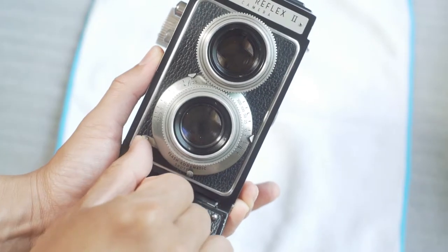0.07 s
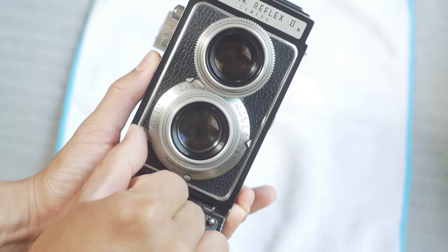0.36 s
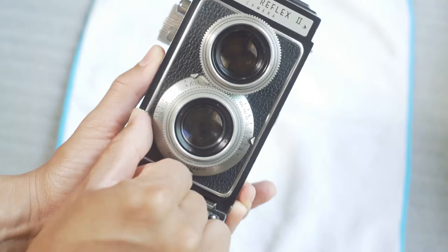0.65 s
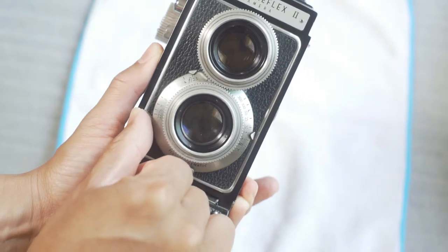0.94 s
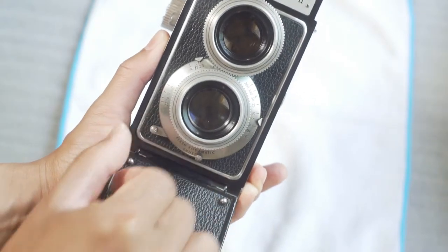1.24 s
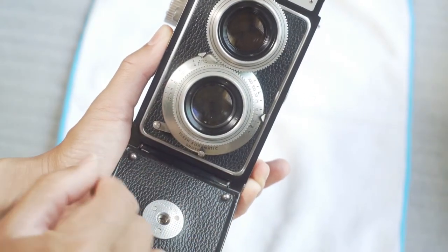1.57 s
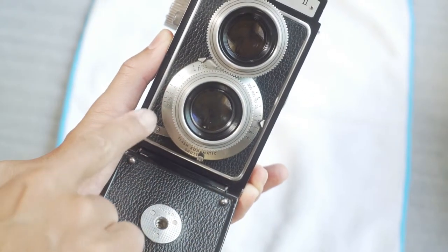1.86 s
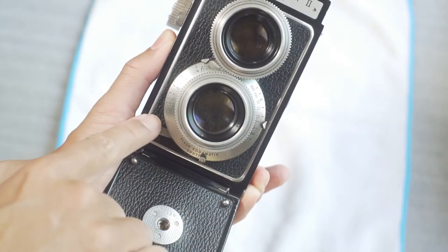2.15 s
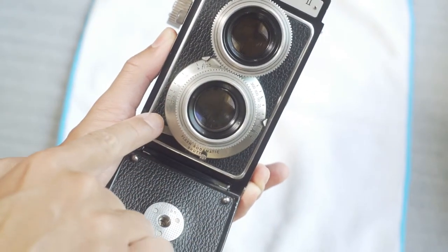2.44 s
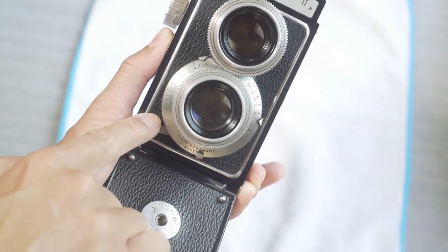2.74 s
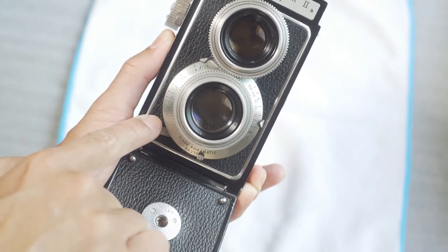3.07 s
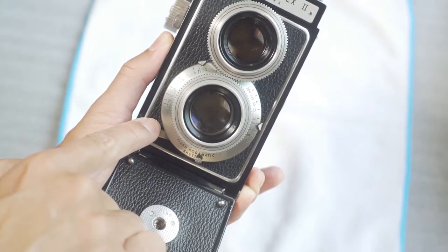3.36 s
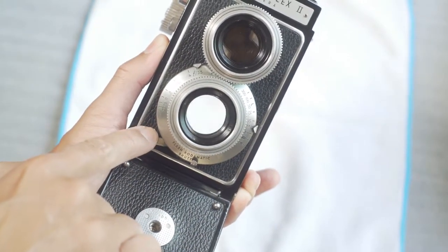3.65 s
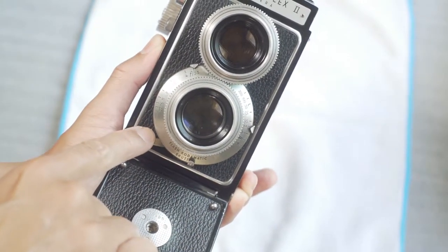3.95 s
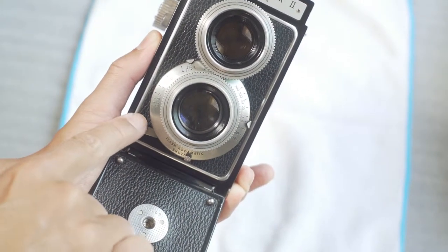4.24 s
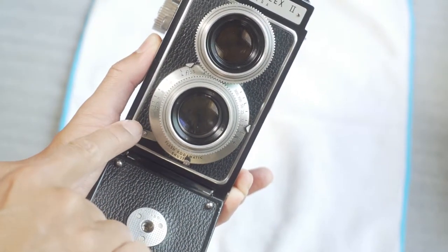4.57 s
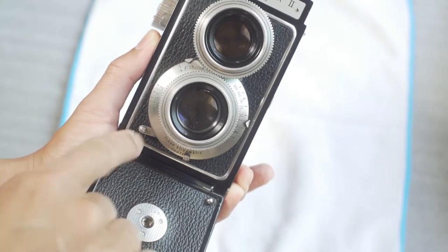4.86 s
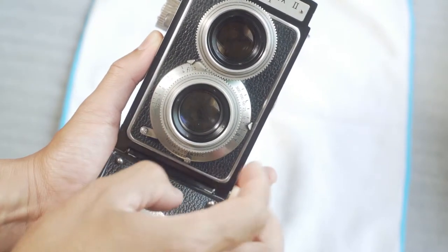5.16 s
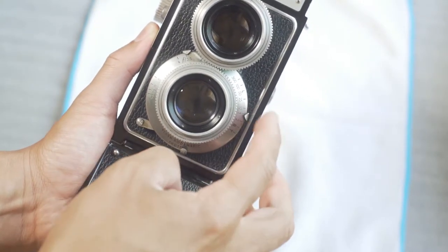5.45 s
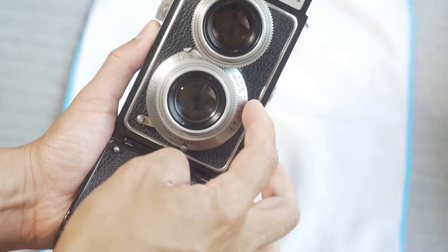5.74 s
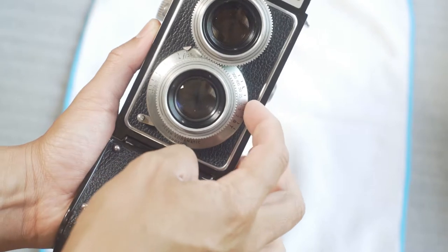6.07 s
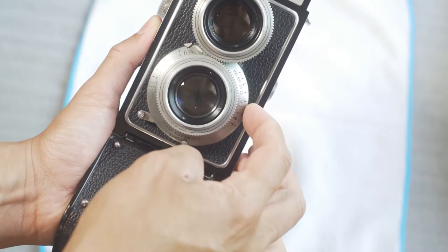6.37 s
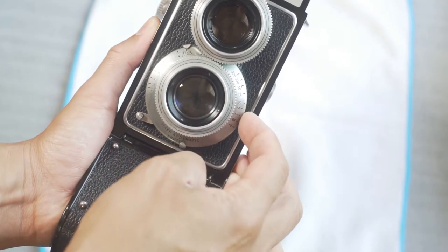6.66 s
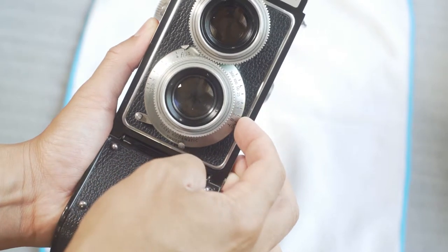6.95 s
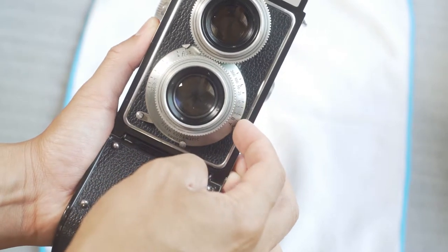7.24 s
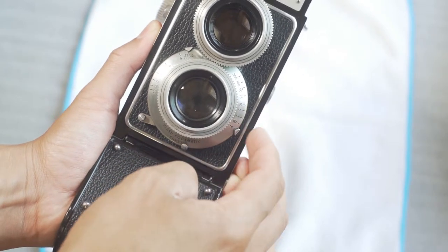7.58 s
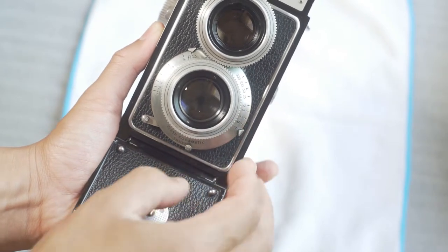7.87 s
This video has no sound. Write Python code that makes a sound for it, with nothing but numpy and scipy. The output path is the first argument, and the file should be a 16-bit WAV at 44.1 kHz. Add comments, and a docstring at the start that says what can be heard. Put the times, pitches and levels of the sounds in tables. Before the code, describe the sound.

An old mechanical camera is cocked and fired close up, with a brief gear whir, sharp metal clicks and a short buzz.

```python
"""A whir, sharp metal snaps and a short buzz, close up over a soft fan hum in a small room: the leaf
shutter of an old twin-lens camera, worked by hand. The cocking lever winds its gears against a spring,
latches and snaps back; on release the blades open, a slow-speed escapement buzzes and the blades shut.
Then a setting lever scrapes round the lens and drops into its stops. Each click is a burst of tiny
rebounds ringing a metal part; a rustle of leather, a faint squeak and a thin whine lie underneath."""
import sys
import numpy as np
from scipy import signal
from scipy.fft import rfft, irfft, next_fast_len
from scipy.io import wavfile
from scipy.ndimage import uniform_filter1d

SR = 44100
rng = np.random.default_rng(int(sys.argv[2]) if len(sys.argv) > 2 else 0)


def log_audio(samples):
    """Write samples as a 16-bit WAV file to the path given in sys.argv[1]."""
    # one column per channel
    frames = np.atleast_2d(samples).T
    # limit to full scale, then quantise
    limited = np.clip(frames, -1, 1)
    pcm = np.round(limited * 32767).astype(np.int16)
    wavfile.write(sys.argv[1], SR, pcm)


N = 353241
TIME = np.arange(N) / SR
SIZE = 4096   # samples in one contact sound
BINS = np.maximum(np.fft.rfftfreq(SIZE, 1 / SR), 1)   # its frequencies, Hz

# rings of the struck parts: (frequency [Hz], width [Hz], height above the broadband crack [dB])
LATCH_MODES = [(1146, 87, 14), (1487, 140, 16.5), (2015, 96, 15.6), (3000, 150, 3.5), (3200, 190, 8.6),
               (4250, 560, 4.9), (6620, 220, 7.6), (8700, 480, 1)]
RETURN_MODES = [(1160, 130, 7.8), (1850, 150, 9.5), (2250, 260, 5.7), (3170, 300, 11.8), (3900, 180, 12.8),
                (5940, 320, 1.1), (7960, 240, 4.1), (13300, 2400, 8.5)]
BLADE_MODES = [(1320, 64, 1), (2215, 210, 11.8), (3220, 230, 10.5), (4200, 280, 2.7), (4970, 400, 10),
               (8740, 260, 4.9), (10150, 370, 2.3), (13250, 200, 1.9)]
DETENT_MODES = [(2100, 540, 12), (2460, 300, 8.3), (3080, 200, 14.6), (3960, 210, 11), (8700, 1400, 6.4),
                (11700, 380, 11), (13600, 600, 3)]
STOP_MODES = [(2050, 510, 5.5), (3090, 140, 23), (3210, 170, 24.6), (4570, 500, 8), (5800, 220, 8.8),
              (8460, 1100, 7.4)]


def from_db(db):
    """Decibels to gain."""
    return 10 ** (np.asarray(db) / 20)


def at_hz(points, hz):
    """Read a curve on a log-frequency axis."""
    f, value = np.transpose(points)
    return np.interp(np.log(np.maximum(hz, 1)), np.log(f), value)


def envelope(rows, attack_s, release_s, sag_db_per_s=0):
    """Gain for rows of (start [s], end [s], level [dB]): straight rise, hold that may sag, dying tail."""
    out = np.zeros(N)
    for start, end, db in rows:
        age = np.maximum(TIME - start, 0)
        tail = np.exp(-np.maximum(TIME - end, 0) / release_s)
        out += from_db(db - sag_db_per_s * age) * np.minimum(age / attack_s, 1) * tail
    return out


def rms_one(x):
    """Scale to unit power."""
    return x / np.sqrt(np.mean(x ** 2) + 1e-20)


def drift(per_s):
    """Smooth random wander of unit power."""
    knots = rng.standard_normal(int(per_s * N / SR) + 2)
    return rms_one(np.interp(TIME * per_s, np.arange(len(knots)), knots))


def convolve(x, response):
    """Pass a sound through an impulse response."""
    return signal.fftconvolve(np.atleast_2d(x), response, axes=-1)[:, :N]


def add(out, s, sound):
    """Mix a short sound in at s seconds."""
    start = int(s * SR)
    out[:, start:start + sound.shape[1]] += sound[:, :N - start]


def tone(hz, waver_hz, per_s):
    """A sine of unit power whose pitch wavers at random."""
    return np.sqrt(2) * np.sin(2 * np.pi * np.cumsum(hz + waver_hz * drift(per_s)) / SR)


def noise(spectrum):
    """Coloured stereo noise, centred in the bass and wide in the treble."""
    # how alike the two sides are: (frequency [Hz], correlation [ratio])
    likeness = [(60, 1), (150, 0.94), (380, 0.92), (950, 0.43), (2380, 0.18), (5980, -0.16), (15000, -0.39)]
    size = next_fast_len(N)
    hz = np.fft.rfftfreq(size, 1 / SR)
    alike = np.clip(at_hz(likeness, hz), 0, 1)
    mid, side = rfft(rng.standard_normal((2, size)))
    pair = np.sqrt(1 + alike) * mid + np.sqrt(1 - alike) * side * [[1], [-1]]
    pair[1] *= np.exp(-2j * np.pi * hz * .00012)   # reaches the right side slightly later
    return rms_one(irfft(pair * from_db(at_hz(spectrum, hz)), size)[:, :N])


def fan():
    """A fan lays down a soft, steady rush of air and a few wavering hum lines."""
    # colour of the rush: (frequency [Hz], spectral level [dB])
    air = [(25, -17.5), (60, -3), (100, -7.5), (135, -2.5), (185, -8), (270, -1.5), (350, -2), (480, -6),
           (620, -5.5), (1000, -11.5), (2500, -18), (3000, -20.5), (6000, -22.5), (16000, -28)]
    # hum lines: (frequency [Hz], level [dB])
    hum_lines = [(77, -74), (239, -71), (280, -68.5), (414.5, -70.5), (603, -72), (839.8, -73), (2546, -80)]
    hum = sum(from_db(db) * tone(hz, waver_hz=3.424, per_s=25) for hz, db in hum_lines)
    return from_db(-55.5) * noise(air) + hum


def metal(modes, tilt_db, lowest_hz, leak_db=-17):
    """Ring of a small part: modes stand on a broadband crack, and little radiates below lowest_hz."""
    # the crack of any contact in the shutter: (frequency [Hz], spectral level [dB])
    crack = [(100, -20), (400, 5.5), (800, -5), (1200, 0.5), (2000, 2), (3000, 1), (5000, 0.5), (7000, 1.5),
             (10000, 0), (14000, 0), (15500, -5), (16000, -11)]
    peaks = sum(from_db(db) ** 2 / (1 + (2 * (BINS - hz) / width) ** 2) for hz, width, db in modes)
    bass_db = 10 * np.log10(from_db(leak_db) ** 2 + 1 / (1 + (lowest_hz / BINS) ** 10))
    brightness_db = tilt_db * np.log2(np.maximum(BINS, 800) / 5000)
    spectrum_db = at_hz(crack, BINS) + 10 * np.log10(1 + peaks) + bass_db + brightness_db
    # minimum phase: the attack comes first, the ring after
    cepstrum = irfft(np.log(from_db(spectrum_db)))
    cepstrum[1:SIZE // 2] *= 2
    cepstrum[SIZE // 2 + 1:] = 0
    return irfft(np.exp(rfft(cepstrum)))


def chatter(length_s, linger=.24, passes=4):
    """A swell of tiny rebounds and a weaker trail, with an even spectrum and unit energy."""
    age = TIME[:SIZE] / length_s
    shape = np.minimum(8 * age, 1) * (np.exp(-age ** 2) + linger * np.exp(-age / 2))
    burst = rng.standard_normal(SIZE) * shape
    for _ in range(passes):   # flatten the spectrum, then restore the swell
        burst = irfft(np.exp(1j * np.angle(rfft(burst))))
        burst *= shape / np.sqrt(np.abs(uniform_filter1d(burst ** 2, size=48)) + 1e-12)
    return burst / np.linalg.norm(burst)


def contact(length_s, modes, tilt_db, lowest_hz, spread=0.52, spread_hz=3000):
    """One click: rebounds ring a metal part, whose treble reaches each side differently."""
    highpass = signal.butter(1, spread_hz, "high", fs=SR, output="sos")
    side = signal.sosfilt(highpass, chatter(length_s))
    burst = chatter(length_s) + spread * side * np.array([[1], [-1]])
    return convolve(burst, metal(modes, tilt_db, lowest_hz)[None])[:, :SIZE]


def clicks(hits, lowest_hz):
    """A run of metal contacts, each with its own level, brightness, clatter and ring."""
    out = np.zeros((2, N))
    for s, db, tilt_db, length_s, modes in hits:
        add(out, s, from_db(db) * contact(length_s, modes, tilt_db, lowest_hz))
    return out


def touches():
    """A finger takes up or eases off a lever; each light tick rings the same linkage."""
    # ring of the linkage: (frequency [Hz], width [Hz], height [dB])
    linkage_modes = [(1090, 180, 10.5), (2260, 150, 9), (3000, 230, 12), (4000, 170, 11), (4970, 320, 7)]
    # finger contacts: (time [s], level [dB], brightness [dB/octave], clatter [s])
    ticks = [ (0.103, -22, 0, .0036), (.212, -29, 0.5, 0.0093), (.3, -21, 2.5, 0.008),
             (.549, -32, -4, 0.0075), (1.042, -36, -5.5, .0055), (1.0575, -30.5, 0, .0039),
             (1.086, -32.5, -2, .008), (1.136, -29.5, -4.5, 0.031), (1.238, -27, -5.5, .011),
             (4.092, -37, -4, 0.0074), ]
    return clicks([(*tick, linkage_modes) for tick in ticks], lowest_hz=900)


def gear_train(teeth_per_s, modes, tilt_db, jitter, uneven_db, slide):
    """Each tooth catches, then slides with fading friction until the next."""
    teeth = np.cumsum(teeth_per_s * np.abs(1 + jitter * drift(150))) / SR
    force = from_db(uneven_db * rng.standard_normal(N))[teeth.astype(int)]
    friction = force * np.exp(-(teeth % 1) / slide) * rng.standard_normal(N)
    return rms_one(convolve(friction, contact(0.00075, modes, tilt_db, lowest_hz=950)))


def winding():
    """The cocking gears whir, fading as the spring resists."""
    # ring of the gears: (frequency [Hz], width [Hz], height [dB])
    modes = [(1100, 100, 10.5), (4000, 330, -5), (6500, 570, 5), (12300, 2000, -2)]
    # the lever takes up its slack, then winds the spring: (start [s], end [s], level [dB])
    strokes = [(.24, .3, -60), (.303, .46, -50)]
    whir = gear_train(teeth_per_s=179.6, modes=modes, tilt_db=.2, jitter=.043, uneven_db=1.5, slide=.81)
    return envelope(strokes, attack_s=0.0055, release_s=0.15, sag_db_per_s=9) * whir


def shutter_snaps():
    """Sprung parts strike home: the spring latches, the lever flies back, the blades open and shut."""
    # strikes: (time [s], level [dB], brightness [dB/octave], clatter [s], modes)
    strikes = [ (.5999, 2.5, 0.1, 0.0041, LATCH_MODES), (1.1662, -1, 0.2, 0.0071, RETURN_MODES),
               (3.6017, -6.5, -2, 0.0059, BLADE_MODES), (3.6077, 4.5, 0, 0.0041, BLADE_MODES),
               (3.777, -14, -2, .0037, BLADE_MODES), (3.7829, -1, 1.5, 0.0032, BLADE_MODES), ]
    return clicks(strikes, lowest_hz=893)


def handling():
    """The hand shifts on the leather case with a dull rustle."""
    # hand movements: (start [s], end [s], level [dB])
    shifts = [(.95, 1.27, -60), (1.52, 2.07, -56.5)]
    # colour of rubbed leather: (frequency [Hz], spectral level [dB])
    leather = [(80, -17), (180, -10), (330, 0), (600, -10.5), (1500, -13.5), (5000, -29)]
    return envelope(shifts, attack_s=0.052, release_s=0.11) * noise(leather)


def squeak(flicker_db=2.5):
    """A faint, thin squeak warbles as its pitch arches up and down."""
    # when it sounds: (start [s], end [s], level [dB])
    span = [(1.51, 2.0, -67)]
    # its partials: (multiple of the pitch [ratio], level [dB])
    partials = [(1, -3.5), (1.345, -8), (2.001, -2)]
    top_hz, top_s, bend_hz_per_s2 = 5190, 1.755, 6600
    warble_per_s, depth_hz, crest_s = 5.7, 231, 1.772
    arch = np.maximum(top_hz - bend_hz_per_s2 * (TIME - top_s) ** 2, 0)
    pitch = arch + depth_hz * np.cos(2 * np.pi * warble_per_s * (TIME - crest_s))
    voice = sum(from_db(db + flicker_db * drift(18)) * tone(multiple * pitch, waver_hz=109, per_s=1400)
                for multiple, db in partials)
    return envelope(span, attack_s=0.06, release_s=.05, sag_db_per_s=5) * voice


def whine():
    """A faint, high whine of nearly steady pitch comes and goes."""
    # when it sounds: (start [s], end [s], level [dB])
    spans = [(2.89, 3.08, -73.5), (3.27, 3.58, -82.5)]
    return envelope(spans, attack_s=0.045, release_s=.05) * tone(hz=5070, waver_hz=35, per_s=520)


def escapement(swell_db=6, swell_s=0.011):
    """The timer's teeth buzz, swelling just before it lets the blades shut."""
    # ring of the escapement: (frequency [Hz], width [Hz], height [dB])
    modes = [(1300, 300, 5), (2130, 330, 11.5), (4950, 270, 10.5), (5700, 330, 3), (7200, 1800, 4.5),
             (11000, 1500, 2)]
    # it runs while the blades are open: (start [s], end [s], level [dB])
    run = [(3.612, 3.782, -38.8)]
    time_left = np.maximum(run[0][1] - TIME, 0)
    swell = from_db(swell_db * np.exp(-time_left / swell_s))
    buzz = gear_train(teeth_per_s=372, modes=modes, tilt_db=0.3, jitter=.28, uneven_db=0, slide=0.6)
    return envelope(run, attack_s=.025, release_s=0.00081) * swell * buzz


def lever_scrape(grains_per_s=200, grain_db=3, tilt_db=-2.5, grain_s=0.0023, jerk_s=0.0038):
    """Dry friction: each push sets off a stream of tiny catches; larger jerks ring the setting lever."""
    # ring of the lever: (frequency [Hz], width [Hz], height [dB])
    modes = [(1150, 500, 7), (3380, 260, 15), (6700, 550, 10), (11800, 900, 11)]
    # pushes along its track: (start [s], end [s], level [dB])
    pushes = [(6.245, 6.32, -59), (6.51, 6.67, -68), (6.675, 6.8, -57.5), (6.97, 7.04, -62)]
    # it sticks and jerks free: (time [s], level [dB])
    jerks = [(6.328, -34), (6.5243, -36.5), (6.6125, -35.5), (6.71, -29), (6.7396, -30.5), (6.786, -33.5),
             (6.8028, -35), (6.9125, -38.5)]
    catches = (rng.random(N) < grains_per_s / SR) * rng.choice([-1, 1], N)
    grains = catches * from_db(grain_db * rng.standard_normal(N))
    scrape = rms_one(convolve(grains, contact(grain_s, modes, tilt_db, lowest_hz=890)))
    out = envelope(pushes, attack_s=0.024, release_s=.02) * scrape
    for s, db in jerks:
        add(out, s, from_db(db) * contact(jerk_s, modes, tilt_db, lowest_hz=1100))
    return out


def lever_stops():
    """The setting lever drops into a detent, then meets its end stop."""
    # the lever clicks home: (time [s], level [dB], brightness [dB/octave], clatter [s], modes)
    stops = [ (7.0426, -28, 1, .0015, DETENT_MODES), (7.0445, -16, -2.5, 0.003, DETENT_MODES),
             (7.1678, -29.5, 1.5, 0.0056, STOP_MODES), (7.1764, -20, -5.5, 0.0022, STOP_MODES), ]
    return clicks(stops, lowest_hz=1510)


def room(x, tail_db=-7.5, build_s=0.0038):
    """Scattered echoes from nearby surfaces, then a diffuse tail whose treble dies first."""
    # decay of the tail: (frequency [Hz], time to fall 60 dB [s])
    decay = [(500, 1), (1500, 0.7), (3000, 0.55), (5000, 0.61), (8000, 0.57), (14000, 0.23)]
    # early reflections: (delay [s], left level [dB], right level [dB])
    echoes = [(.0045, -10, -8.5), (.0100, -14.5, -7.5), (0.015, -32, -7.5), (0.049, -29, -19)]
    t = TIME[:int(.8 * SR)]
    hz = np.fft.rfftfreq(len(t), 1 / SR)
    white = rfft(rng.standard_normal((2, len(t))))
    response = np.zeros((2, len(t)))
    edges = np.geomspace(400, SR / 2, 20)
    for low, high in zip(edges, edges[1:]):
        band = irfft(white * ((hz >= low) & (hz < high)), len(t))
        response += band * from_db(-60 * t / at_hz(decay, np.sqrt(low * high)))
    response *= np.minimum(t / build_s, 1)
    response *= from_db(tail_db) / np.linalg.norm(response[0])
    for delay, *sides_db in echoes:
        add(response, delay, np.array([from_db(db) * chatter(0.0034) for db in sides_db]))
    return convolve(x, response)


def scene():
    """The camera sits a little to the right; the setting lever faces the listener and sounds drier."""
    shutter = shutter_snaps() + touches() + winding() + escapement()
    setting = lever_stops() + lever_scrape()
    direct = (shutter + setting) * from_db([[-1.2], [1.2]])
    reverb = room((shutter + from_db(-1.0) * setting).mean(axis=0))
    return direct + reverb + handling() + squeak() + whine() + fan()


def record(dry):
    """A steep low-pass takes off the very top."""
    cutoff_hz = 15900
    return signal.sosfilt(signal.ellip(10, .1, 80, cutoff_hz, fs=SR, output="sos"), dry)


dry = scene()
out = record(dry)
log_audio(out)
```